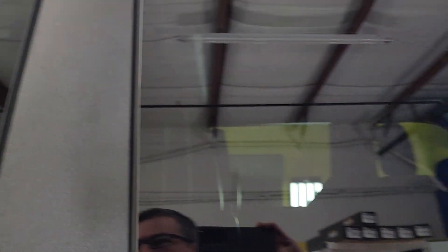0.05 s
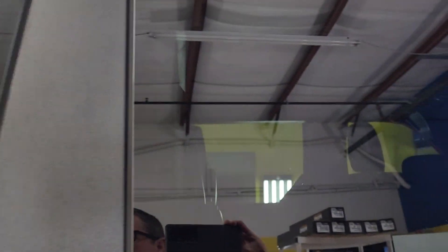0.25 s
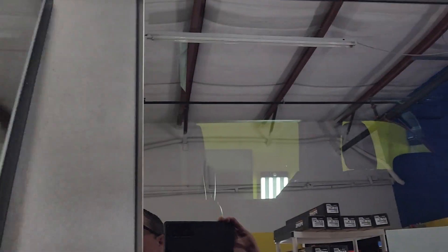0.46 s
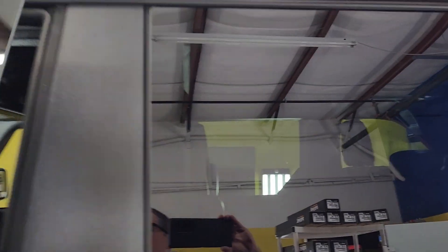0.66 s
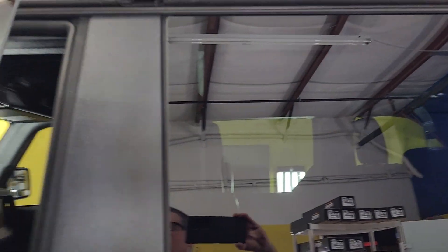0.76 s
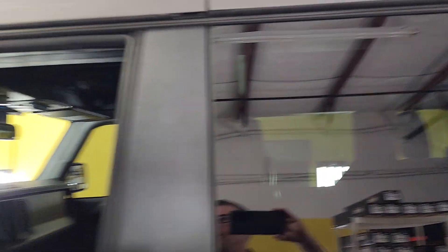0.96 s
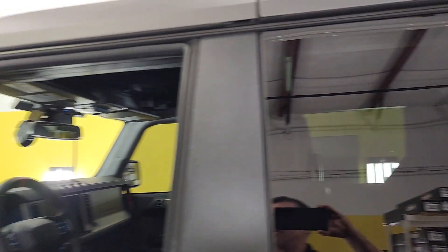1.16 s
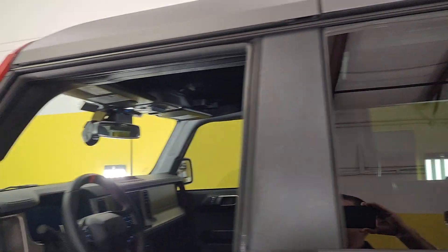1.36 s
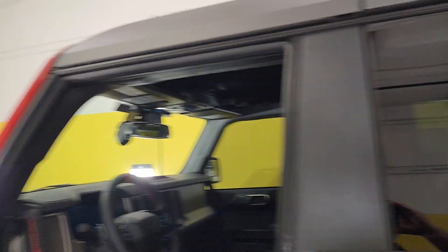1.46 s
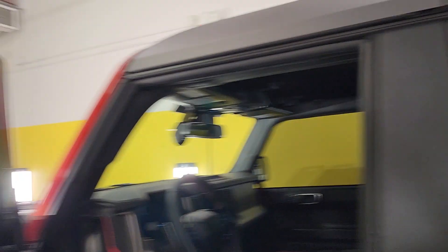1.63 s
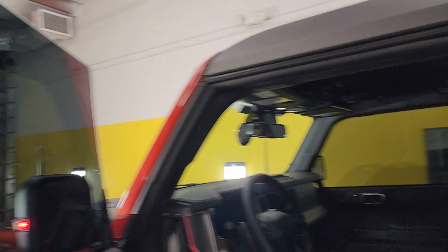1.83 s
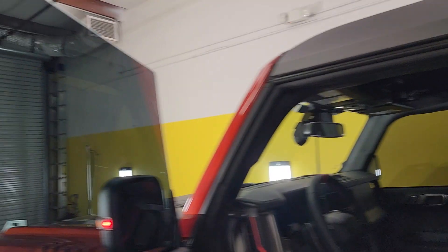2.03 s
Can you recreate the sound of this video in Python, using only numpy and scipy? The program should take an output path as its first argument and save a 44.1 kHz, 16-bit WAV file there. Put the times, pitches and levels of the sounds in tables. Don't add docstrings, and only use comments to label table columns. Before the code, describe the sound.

A vehicle door latch releases with one loud, hollow clunk in an echoing workshop, light rustling around it

```python
import sys
import numpy as np
from scipy import signal
from scipy.fft import rfft, irfft
from scipy.io import wavfile
from scipy.ndimage import uniform_filter1d

SR = 44100
rng = np.random.default_rng(int(sys.argv[2]) if len(sys.argv) > 2 else 0)


def gain_from_db(level_db):
    decades = np.asarray(level_db, float) / 20
    return 10 ** decades


def bounce(signal):
    frames = np.transpose(np.atleast_2d(signal))
    limited = np.clip(frames, -1, 1)
    pcm = np.round(limited * 32767).astype(np.int16)
    wavfile.write(sys.argv[1], SR, pcm)


N = 92257
PORT_LAG = 17


def evened(x):
    return x / np.sqrt(np.mean(x ** 2) + 1e-20)


def read(points, hz):
    f, value = np.transpose(points)
    return np.interp(np.log(hz + 1), np.log(f + 1), value)


def add(mix, s, sound):
    at = round(s * SR)
    mix[:, at:at + sound.shape[1]] += sound


def resonate(x, hz, width):
    r = np.exp(-np.pi * width / SR)
    return 2 * signal.lfilter([1 - r], [1, -r * np.exp(2j * np.pi * hz / SR)], x).real


def colour(x, points):
    n = x.shape[-1]
    gain = gain_from_db(read(points, np.fft.rfftfreq(n, 1 / SR)))
    return evened(irfft(rfft(x) * gain, n))


def band(x, lo_hz, hi_hz):
    sos = signal.butter(2, [lo_hz, hi_hz], "bandpass", fs=SR, output="sos")
    return evened(signal.sosfilt(sos, x))


def ports(x, pan_db=0):
    return np.array([x * gain_from_db(pan_db / 2), np.roll(x, PORT_LAG) * gain_from_db(-pan_db / 2)])


# frequency in Hz, level in dB per Hz.
HALL_SPECTRUM = [(20, -12), (59, 0), (125, -3), (252, -15), (393, -18.5), (452, -27), (985, -24.5),
                 (8300, -62.5), (15500, -95)]
# frequency in Hz, likeness from 0 to 1.
PORT_LIKENESS = [(60, 1), (130, 0.97), (290, 1), (640, 1), (1400, 0.43), (15000, 0.031)]
# frequency in Hz, left over right in dB.
HALL_LEAN = [(60, 1), (150, 0), (380, 2.5), (950, -0.5), (2380, -7), (5980, 19), (15000, 18)]
# frequency in Hz, level in dB.
MOTOR_LINES = [(1001, -71), (1631, -75), (2003, -76), (2998, -84)]
# time in seconds, motor level in dB.
MOTOR_FACING = [
    (0, -10),
    (1.2, -8),
    (1.55, 0),
    (2.09, 0),
]


def hall():
    frames, hz = N // 512 + 5, np.fft.rfftfreq(2048, 1 / SR)
    a, b, c, d, patches = rng.standard_normal((frames, 1025, 5)).T
    patches = evened(uniform_filter1d(uniform_filter1d(patches, 8, 0), 6, 1))
    same = np.clip(read(PORT_LIKENESS, hz), -1, 1)[:, None]
    lag = np.exp(-2j * np.pi * hz * PORT_LAG / SR)[:, None]
    left = a + 1j * b
    right = same * lag * left + np.sqrt(1 - same ** 2) * (c + 1j * d)
    side = np.array([.5, -.5])[:, None, None]
    level_db = read(HALL_SPECTRUM, hz)[:, None] + 1.8 * patches + side * read(HALL_LEAN, hz)[:, None]
    z = np.array([left, right]) * gain_from_db(level_db)
    air = gain_from_db(-44) * evened(signal.istft(z, nperseg=2048, noverlap=1536)[1][:, :N])

    t = np.arange(N) / SR
    lines = np.zeros((2, N))
    for hz, db in MOTOR_LINES:
        waver = evened(resonate(rng.standard_normal((2, N)), hz, 12.0))
        lines += gain_from_db(db) * evened(np.sin(2 * np.pi * hz * t) + .5 * waver)
    return air + lines * gain_from_db(np.interp(t, *np.transpose(MOTOR_FACING)))


# time in seconds, handling effort in dB.
SLEEVE_EFFORT = [(0, -79), (.15, -77), (.2, -80.5), (0.286, -81), (0.298, -66.5), (0.358, -70.5),
                 (0.452, -77.5), (.8, -77), (.97, -70), (1.119, -78), (1.201, -73), (1.291, -77.5),
                 (1.361, -79.5), (1.55, -83), (2.09, -83)]
# frequency in Hz, level in dB per Hz.
CLOTH_SPECTRUM = [(700, -38), (1500, 5.5), (2500, -4.5), (4500, -10.5), (8000, -14), (12000, -21.5),
                  (15500, -17)]


def cloth():
    unevenness = evened(uniform_filter1d(rng.standard_normal(N), 120))
    grains = rng.standard_normal((2, N)) * gain_from_db(1.1 * unevenness)
    s, db = np.transpose(SLEEVE_EFFORT)
    return colour(grains, CLOTH_SPECTRUM) * gain_from_db(np.interp(np.arange(N) / SR, s, db) + 14.5)


# start in seconds, level in dB, frequency in Hz, width in Hz, length in seconds.
FINGER_BRUSHES = [
    (.15, -74, 12600, 5000, .04),
    (1.497, -78, 13000, 5000, 0.025),
    (1.675, -74.5, 12500, 5030, 0.063),
    (1.695, -81, 12500, 5000, .02),
    (1.25, -69, 12500, 6000, .09),
    (1.882, -77, 12950, 5000, 0.024),
    (1.885, -73, 7200, 1500, .03),
]
# start in seconds, level in dB, frequency in Hz, width in Hz, length in seconds.
DOOR_RATTLES = [(.560, -41, 2100, 2400, .03), (.566, -50, 5400, 500, .02), (.6475, -42, 3800, 900, .013),
                (.6475, -46, 5600, 1000, .008), (.666, -41, 1800, 1200, .025), (.670, -42, 3700, 1500, .022),
                (.664, -45, 850, 500, .03), (.655, -34, 300, 120, .04), (.355, -42, 280, 200, .06),
                (1.24, -56, 2000, 900, .08), (1.26, -48, 250, 200, .07), (1.195, -42, 150, 90, .09),
                (.525, -30, 220, 300, .08), (.63, -32, 145, 60, .09), (.316, -46, 1100, 1200, .03),
                (.39, -46, 380, 150, .05), (1.213, -41, 220, 200, .07), (.3, -44, 140, 60, .09)]


def chatter(contacts):
    out, t = np.zeros((2, N)), np.arange(4000) / SR
    for s, db, hz, width, length in contacts:
        a = rng.standard_normal((3, 4000))
        grains = a[:2] * gain_from_db(3 * evened(uniform_filter1d(a[2], 60)))
        rattle = evened(resonate(resonate(grains, hz, width), hz, width))
        add(out, s, rattle * np.minimum(t / .002, 1) * gain_from_db(db - 14 * (t / length) ** 2))
    return out


# start in seconds, ring in dB, ring frequency in Hz, knock in dB, fizz in dB.
METAL_TICKS = [(0.2958, -43, 2300, -36, -47.5), (0.3082, -58, 6350, -45, -39), (.3151, -24, 2350, -21, -46),
               (.3152, -34, 3950, -60, -60), (0.3196, -36, 5780, -34, -38.5),
               (0.3218, -26.5, 1750, -33.5, -51), (0.3273, -63, 4870, -34.5, -44),
               (.3340, -41, 5660, -34, -37), (0.342, -57, 5510, -50, -41), (.3528, -32, 1920, -62, -39),
               (.3995, -52, 6400, -77, -70), (0.407, -34.5, 1700, -58, -85), (.4095, -48, 1870, -62, -82),
               (0.5037, -31, 2080, -66, -40.5), (1.2121, -37, 1940, -61, -53.5),
               (1.2173, -42, 2250, -29, -50.5), (1.2240, -46, 1000, -31.5, -59),
               (1.2325, -42, 2150, -33, -65), (1.2401, -48, 2060, -48, -60),
               (1.2635, -50.5, 2200, -51.5, -58)]


def ticks():
    ring_t60, knock_t60, fizz_t60 = .01, .035, .018
    ring_q = 8.9
    out, t = np.zeros((2, N)), np.arange(3000) / SR
    for s, ring_db, hz, knock_db, fizz_db in METAL_TICKS:
        a = rng.standard_normal((4, 3000))
        roughness = evened(resonate(a[0], hz, hz / ring_q))
        ring = (np.sin(2 * np.pi * hz * t) + 0.067 * roughness) * gain_from_db(ring_db - 60 * t / ring_t60)
        knock = -np.cos(2 * np.pi * 540 * t) * np.exp(-t / 0.003)
        knock += .25 * np.cos(2 * np.pi * 950 * t) * np.exp(-t / .004)
        knock += .15 * band(a[1], 300, 1100)
        knock *= gain_from_db(knock_db - 60 * t / knock_t60)
        fizz = band(a[2:], 5000, 17000) * gain_from_db(fizz_db - 60 * t / fizz_t60)
        add(out, s, (ports(ring, 0.53) + ports(knock, 0.19) + fizz) * np.minimum(t / 0.00091, 1))
    return out


# pressure trough in seconds, level in dB, decay scale, tilt in dB per octave.
SKIN_BLOWS = [
    (.5077, -2, 1, 0),
    (.5121, -8, .3, 1.5),
    (.5148, -13, .3, 1.5),
    (.5308, -13, .6, -.6),
    (.5415, -14, 1.01, -1.5),
    (.5575, -16, 1.01, -5),
    (.6195, -24, .8, -3.5),
    (.688, -30, .6, -4),
    (1.2115, -34, .8, -5),
]
# frequency in Hz, level in dB, T60 in seconds.
SKIN_MODES = [(41.7, -14, 0.67), (62.6, -7, 0.38), (107, -20, 0.14), (118, -3.5, 0.15), (146.8, -4, 0.22),
              (174.3, -8, 0.27), (242, -1, 0.031), (282, 0, 0.072), (371, -9, 0.3), (434, -10, 0.061),
              (570, -5, 0.04), (709, -19.5, 0.26), (891, -11.5, 0.11), (1051.7, -14, 0.16)]


def skin():
    push_s = 0.0039
    stretch, settle_s = 0.11, 0.035
    out, t = np.zeros((2, N)), np.arange(-400, 26000) / SR
    after = np.maximum(t, 0)
    rise = np.exp(-.5 * (np.minimum(t, 0) / push_s) ** 2)
    sag = t + stretch * settle_s * (1 - np.exp(-after / settle_s)) - stretch / 2 * t
    for s, blow_db, scale, tilt_db in SKIN_BLOWS:
        ring = np.zeros(len(t))
        for hz, db, t60 in SKIN_MODES:
            decay = gain_from_db(db + tilt_db * np.log2(hz / 100) - 60 * after / (t60 * scale))
            ring -= decay * np.cos(2 * np.pi * hz * sag)
        ring = ring * rise / abs(ring).max() * gain_from_db(blow_db)
        add(out, s - 400 / SR, np.array([ring * gain_from_db(1.2), np.roll(ring, 8) * gain_from_db(-1.2)]))
    return out


SNAP_S = .5107
# frequency in Hz, level in dB, T60 in seconds.
PAWL_MODES = [(1780, -16, .015), (2200, 1, .009), (2470, -11, .016), (4100, -10, .014), (6500, -13, .007),
              (12500, -15, .006)]
# frequency in Hz, level in dB per Hz.
CRACK_SPECTRUM = [(400, -39), (900, -1.5), (2300, 0.5), (3000, -13), (4200, -8.5), (7000, -15),
                  (12000, -15.5), (15500, -21)]


def snap():
    out, t = np.zeros((2, N)), np.arange(4000) / SR
    ring = sum(gain_from_db(db - 60 * t / t60) * np.sin(2 * np.pi * hz * t) for hz, db, t60 in PAWL_MODES)
    ring = ring * gain_from_db(-3) * np.minimum(t / .0011, 1) ** 2
    a = rng.standard_normal((3, 4000))
    crack = 0.12 * ports(colour(a[0], CRACK_SPECTRUM)) + 1.39 * colour(a[1:], CRACK_SPECTRUM)
    crack *= gain_from_db(-19 - 60 * t / .03)
    add(out, SNAP_S, ports(ring, 1.5) + crack * np.minimum(t / .0008, 1))
    return out


# frequency in Hz, level in dB per Hz.
WALL_SNAP_SPECTRUM = [(300, -15), (700, 3.5), (2300, 1), (4500, -8.5), (8000, -12), (12000, -11.5),
                      (15500, -7.5)]


def wall_snap():
    click = np.zeros(2048)
    click[1024] = 1
    out = np.zeros((2, N))
    add(out, SNAP_S - 1024 / SR, colour(click, WALL_SNAP_SPECTRUM)[None] * gain_from_db(-28))
    return out


# frequency in Hz, T60 in seconds.
ECHO_T60 = [(60, 0.94), (250, 1), (1000, 0.86), (4000, 0.85), (8000, 0.78), (15000, 0.36)]
# frequency in Hz, level in dB.
ECHO_SPECTRUM = [(60, -7), (300, -7.5), (1000, 0.5), (15000, 1.8)]


def walls(x):
    gap_s = .016
    taps = np.zeros((2, SR))
    at = np.arange(0, SR - 20, 20) + rng.integers(0, 20, (2, SR // 20 - 1))
    np.put_along_axis(taps, at, rng.choice([-1., 1.], at.shape), 1)
    low = signal.sosfilt(signal.butter(2, 450, fs=SR, output="sos"), taps)
    taps = taps - low + low[0]
    hz, t, z = signal.stft(taps, SR, nperseg=256)
    decay = gain_from_db(read(ECHO_SPECTRUM, hz)[:, None] - 60 * t / read(ECHO_T60, hz)[:, None])
    tail = signal.istft(z * decay, SR, nperseg=256)[1]
    tail = np.pad(tail / np.linalg.norm(tail[0]), ((0, 0), (round(gap_s * SR), 0)))
    return signal.fftconvolve(x.mean(0)[None], tail, axes=1)[:, :N]


def hinge():
    start_s, length_s, start_hz, end_hz = .695, .095, 660, 550
    out, u = np.zeros((2, N)), np.linspace(0, 1, round(length_s * SR))
    turns = np.cumsum(start_hz + (end_hz - start_hz) * u) / SR
    wobble = 1 + 0.38 * evened(uniform_filter1d(rng.standard_normal(len(u)), size=300))
    swell = np.sqrt(np.sin(np.pi * u).clip(0))
    add(out, start_s, ports(np.sin(2 * np.pi * turns) * wobble * swell * gain_from_db(-49.5)))
    return out


# frequency in Hz, width in Hz, level in dB.
GLASS_RESONANCES = [(1320, 150, -11), (1630, 220, -4), (1850, 480, -3), (2000, 220, -1), (3000, 1200, -12),
                    (4200, 200, -11), (4600, 1000, -18)]


def glass():
    start_s, rise_s, hold_s, t60 = .826, .012, 0.19, 0.66
    t = np.arange(30000) / SR
    unevenness = evened(uniform_filter1d(rng.standard_normal(30000), 250))
    slips = rng.standard_normal((2, 30000)) * gain_from_db(1.5 * unevenness)
    slips = np.array([slips[0], 0.081 * np.roll(slips[0], PORT_LAG) + 1.1 * slips[1]])
    rub = np.zeros((2, 30000))
    for hz, width, db in GLASS_RESONANCES:
        rub += gain_from_db(db) * resonate(resonate(slips, hz, width), hz, 2 * width) / np.sqrt(width)
    shape = np.minimum(t / rise_s, 1) * gain_from_db(-51.5 - 60 * np.maximum(t - hold_s, 0) / t60)
    out = np.zeros((2, N))
    add(out, start_s, evened(rub) * shape * gain_from_db([[-1.5], [1.5]]))
    return out


def stay():
    out, t = np.zeros((2, N)), np.arange(12000) / SR
    hz = 97 * (1 - .3 * np.exp(-t / 0.012))
    ring = -np.sin(2 * np.pi * np.cumsum(hz) / SR) * np.minimum(t / 0.0039, 1)
    ring *= gain_from_db(-30.5 - 60 * t / 0.39)
    add(out, 1.2462, ports(ring, 0.76))
    return out


def scene():
    door = ticks() + chatter(DOOR_RATTLES) + skin() + hinge() + glass() + stay()
    echo = gain_from_db(-10) * walls(door + wall_snap())
    return hall() + cloth() + chatter(FINGER_BRUSHES) + door + snap() + echo


def band_limit(x):
    return signal.sosfilt(signal.butter(12, 16510, fs=SR, output="sos"), x)


# frequency in Hz, level in dB.
MIC_COLOUR = [(5000, 3), (6200, -0.5), (7600, 5), (8300, 1), (9000, -5), (10300, -4), (11500, 3.5),
              (15500, -1.5)]


def record(dry):
    ceiling, edge_hz = 1.04, 16100
    hz = np.fft.rfftfreq(2 ** 17, 1 / SR)
    heard = irfft(rfft(dry, 2 ** 17) * gain_from_db(read(MIC_COLOUR, hz)))
    heard = heard / (1 + abs(heard / ceiling) ** 6) ** (1 / 6)
    heard = irfft(rfft(heard) * np.clip((edge_hz - hz) / 500, 0, 1))[:, :N]
    return band_limit(heard)


dry = scene()
out = record(dry)
bounce(out)
```